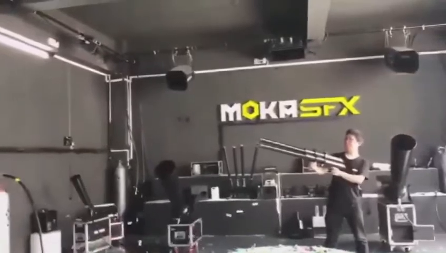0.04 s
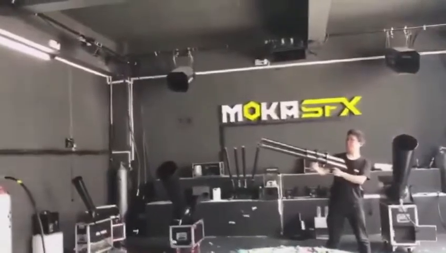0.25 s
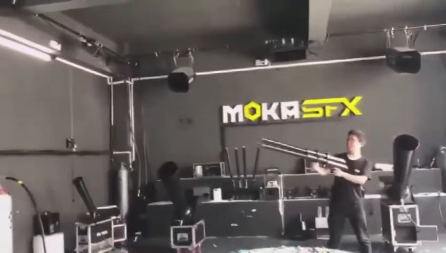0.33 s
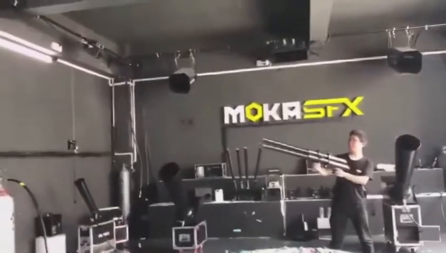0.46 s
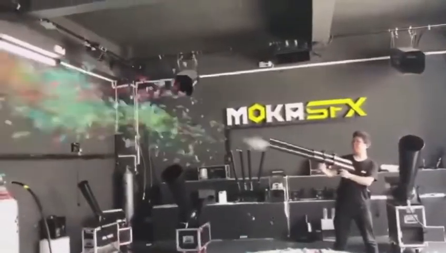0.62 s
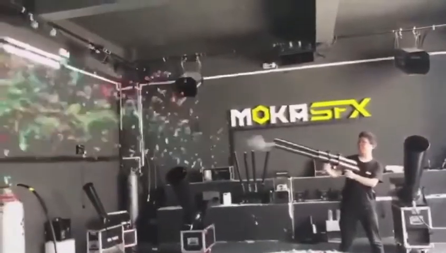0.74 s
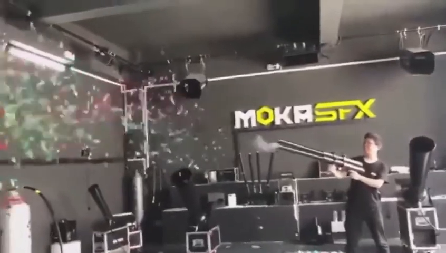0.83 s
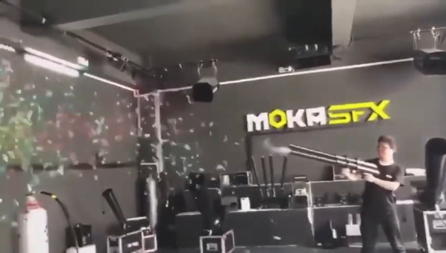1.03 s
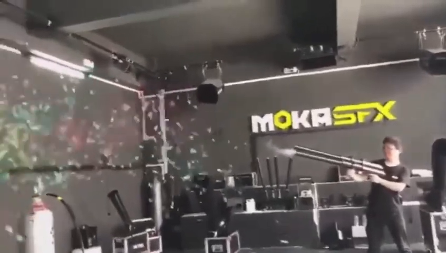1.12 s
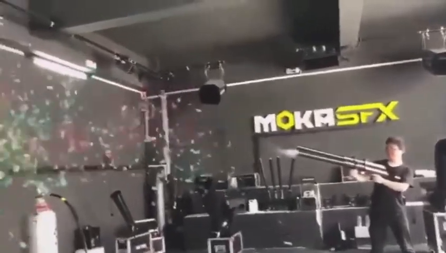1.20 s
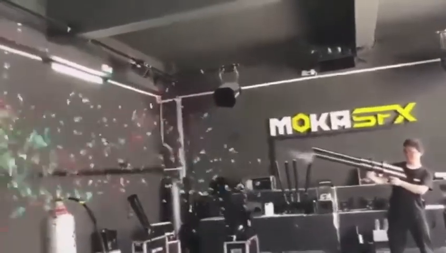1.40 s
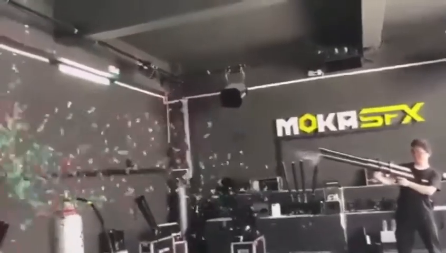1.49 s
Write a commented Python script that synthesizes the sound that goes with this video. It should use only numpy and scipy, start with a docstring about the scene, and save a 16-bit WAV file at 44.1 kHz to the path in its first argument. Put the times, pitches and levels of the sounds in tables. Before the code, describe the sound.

One sharp confetti cannon pop and a hissing rush of gas, ringing around a hard-walled room.

```python
"""A hard-walled workshop, where a compressed-gas confetti launcher fires once.
The valve hisses, gas rushes up the barrel and the charge pops out with a low puff of air.
The tank then empties in a fluttering, spitting jet that the room draws out into a long whoosh.
The bang overloads the recorder, which ducks its gain; one faint tick follows the shot."""
import sys
import numpy as np
from scipy import signal
from scipy.fft import rfft, irfft
from scipy.io import wavfile

SR = 44100
rng = np.random.default_rng(int(sys.argv[2]) if len(sys.argv) > 2 else 0)


def inscribe(sig):
    """Save sig as 16-bit PCM at rate SR to the path in sys.argv[1].

    A 1-D sig is mono; a 2-D sig holds one channel per row.
    Samples are clipped to [-1, 1] before scaling.
    """
    pcm = np.round(np.clip(np.atleast_2d(sig).T, -1, 1) * 32767)
    wavfile.write(sys.argv[1], SR, pcm.astype(np.int16))


N = 68355
TIME = np.arange(N) / SR
FREQS = np.maximum(np.fft.rfftfreq(N, 1 / SR), 1)

VALVE_S, RUSH_S, POP_S = 0.16, 0.2004, 0.2256   # cues: valve opens, gas rushes, charge leaves the muzzle
BANDWIDTH_HZ = 7660   # top of the recorder's input band

# Colour of the workshop's room tone: frequency_hz, relative_db
ROOM_TONE_COLOUR = [(25, -16), (75, 4), (130, -1.5), (300, -2.5), (700, -5.5), (1450, -7.5), (2000, -16.5),
                    (3200, -18.5), (5000, -24.5), (7500, -28.5)]
# Reverb time across the spectrum: frequency_hz, t60_s
REVERB_TIMES = [(60, 0.87), (200, 1.35), (600, 1.53), (2000, 1.69), (4000, 1.56), (7500, 1.03)]
# Clusters of room modes that ring on: centre_hz, width_hz, gain_db
MODE_CLUSTERS = [(448, 26.5, -1), (837, 50, -10), (1158, 59, -4.5), (1800, 70, -3.5), (2015, 50, -6.5)]
# Colour of the air pushed out ahead of the charge: frequency_hz, relative_db
PUFF_COLOUR = [(20, -18), (50, 1.5), (100, 2), (165, -4.5), (260, -21.5), (600, -44)]
# Hiss spat out by the jet: peak_s, half_length_s, level_db, centre_hz, width_hz
HISS_SPURTS = [(.26, 0.022, -18.5, 6700, 2600), (0.281, 0.019, -19, 5200, 2600),
               (0.315, 0.015, -26.5, 7000, 1200), (0.359, 0.02, -18.5, 6960, 2000),
               (.41, .017, -22.5, 6600, 800), (0.472, 0.017, -21.5, 5120, 890),
               (0.521, 0.017, -25, 5850, 600), (.567, .022, -29.5, 6930, 1500),
               (.64, 0.033, -30.5, 4200, 1500), (0.735, 0.015, -40, 6250, 1800)]
# Colour of the open jet: frequency_hz, relative_db
JET_COLOUR = [(30, -37), (70, -4), (130, -7), (200, -2.5), (320, -3), (600, -9.5), (1000, -4.5), (1450, -6),
              (2400, -4), (3400, -7.5), (5400, -16), (7500, -28.5)]
# Barrel and room resonances mixed into the jet: centre_hz, width_hz, gain_db
JET_RESONANCES = [(198.3, 24, -2), (438, 47, -3.5), (625, 63, 7.5), (1172, 110, -4), (1410, 33, -3.5),
                  (1755, 71, -12.5), (2070, 48, -6.5), (2566, 48, -6.5), (3430, 130, -17.5),
                  (4020, 82, -13.5)]
# Gas flow, easing after the shot and swelling before the tank runs out: time_s, gain_db
JET_ENVELOPE = [(.245, 3), (.285, -3), (.33, -0.5), (.38, 0), (.45, -1), (.495, 0), (.53, -6), (.6, -12.5),
                (.75, -28), (1.1, -82)]
# Colour of the gas rushing up the barrel: frequency_hz, relative_db
RUSH_COLOUR = [(30, -8.5), (100, -1.5), (250, -5.5), (450, -4), (850, -5.5), (1600, -10.5), (3100, -12.5),
               (4400, -19.5), (6600, -14), (7600, -27.5)]
# Colour of the gas tearing past the charge: frequency_hz, relative_db
CRACK_COLOUR = [(100, -27.5), (800, -0.5), (1700, -6), (3000, -1), (4400, -3), (6600, -7), (7500, -25)]
# Faint slow swells of the barrel after the pop, each scaled by a nominal pitch far below audible: pitch_hz,
# level_db, decay_s
BARREL_SWELL = [(50, -24, 0.033), (157, -21, .014), (410, -8, 0.013), (510, -17.5, .014), (710, -18, .015),
                (1830, -18, .016)]


def from_db(db):
    """Decibels to gain."""
    return 10 ** (np.asarray(db) / 20)


def rms_one(x):
    """Scale to unit rms."""
    return x / np.sqrt(np.mean(x ** 2) + 1e-20)


def at_hz(points, hz):
    """Read a table on a log-frequency axis."""
    frequencies, values = np.transpose(points)
    return np.interp(np.log(hz), np.log(frequencies), values)


def since(start_s):
    """Seconds after a cue, zero before it."""
    return np.maximum(TIME - start_s, 0)


def noise(colour):
    """Coloured noise within the input band, rms 1."""
    eq = from_db(at_hz(colour, FREQS)) * (FREQS < BANDWIDTH_HZ)
    return rms_one(irfft(rfft(rng.standard_normal(N)) * eq, N))


def flutter(corner_hz=25):
    """Slow random wavering, rms 1."""
    return rms_one(irfft(rfft(rng.standard_normal(N)) / (1 + (FREQS / corner_hz) ** 2), N))


def bands(x):
    """Split into third-octave bands, yielding centre_hz and signal."""
    centres, spectrum = np.geomspace(30, 7680, 25), rfft(x)
    for hz, share in zip(centres, np.eye(len(centres))):
        crossover = np.interp(np.log(FREQS), np.log(centres), share)
        yield hz, irfft(spectrum * crossover, N)


def resonate(x, hz, width_hz):
    """Two-pole resonance with unity gain at its peak."""
    radius = np.exp(-np.pi * width_hz / SR)
    feedback = [1, -2 * radius * np.cos(2 * np.pi * hz / SR), radius ** 2]
    return signal.lfilter(np.array([1, 0, -1]) * (1 - radius ** 2) / 2, feedback, x)


def low_pass(x, hz):
    """Brick-wall high cut."""
    return signal.fftconvolve(x, signal.firwin(601, hz, fs=SR, window=("kaiser", 9)), "same")


def smooth(x, time_s):
    """One-pole lag."""
    keep = np.exp(-1 / (time_s * SR))
    return signal.lfilter([1 - keep], [1, -keep], x)


def room_tone():
    """The workshop's steady, low bed of noise."""
    return from_db(-39) * noise(ROOM_TONE_COLOUR)


def workshop_reverb(x, build_s=0.014, mode_t60_s=2.16):
    """Hard walls give a diffuse tail that blooms fast and dies sooner up top; room modes ring on."""
    wash = sum(band * from_db(-60 * TIME / at_hz(REVERB_TIMES, hz))
               for hz, band in bands(rng.standard_normal(N)))
    modes = sum(from_db(db) * resonate(rng.standard_normal(N), hz, width)
                for hz, width, db in MODE_CLUSTERS)
    tail = wash + modes * from_db(-60 * TIME / mode_t60_s)
    tail *= 1 - np.exp(-TIME / build_s)
    return signal.fftconvolve(x, tail / np.sqrt(np.sum(tail ** 2)))[:N]


def treble_flicker(x, corner_hz=4000):
    """The treble flickers, partly in step and partly band by band."""
    together, out = flutter(), 0
    for hz, band in bands(x):
        depth_db = 3 * hz ** 2 / (hz ** 2 + corner_hz ** 2)
        out += band * from_db(depth_db * (0.5 * together + flutter()))
    return out


def tick(at_s=0.3004):
    """One faint, very bright tick."""
    return from_db(-21) * (np.arange(N) == round(at_s * SR))


def valve():
    """A thin hiss fades in as the valve opens and cuts off at the pop."""
    opening = np.clip((TIME - VALVE_S) / (RUSH_S - VALVE_S), 0, 1) * (TIME < POP_S)
    hiss = rms_one(resonate(rng.standard_normal(N), hz=5450, width_hz=1700))
    return from_db(-39) * opening * hiss


def puff(start_s=0.22, attack_s=0.0099, decay_s=0.028):
    """Air pushed out ahead of the charge gives the shot its low end."""
    age = since(start_s)
    envelope = (1 - np.exp(-age / attack_s)) * np.exp(-age / decay_s)
    return from_db(-16.5) * noise(PUFF_COLOUR) * envelope


def spurts():
    """The jet spits short surges of hiss, each centred on its own pitch."""
    out = 0
    for peak_s, half_length_s, db, hz, width in HISS_SPURTS:
        hiss = rms_one(resonate(resonate(rng.standard_normal(N), hz, width), hz, width))
        swell = np.exp(-2 * ((TIME - peak_s) / half_length_s) ** 2)
        out += from_db(db) * hiss * swell
    return out


def jet(turbulence_db=3, dulling_db_per_s=38.5):
    """The tank empties through the barrel: hiss fills out into a fluttering roar, dulls and runs out."""
    age, roar = since(POP_S), noise(JET_COLOUR)
    ringing = sum(from_db(db) * resonate(roar, hz, width) for hz, width, db in JET_RESONANCES)
    out = 0
    for hz, band in bands(rms_one(roar + ringing)):
        attack_s = 0.073 / (1 + hz / 2000)   # highs open first, so the hiss leads the roar
        opening = 1 - np.exp(-age / attack_s)
        dulling_db = dulling_db_per_s * age * hz / 7000   # the top fades as tank pressure drops
        out += band * opening * from_db(turbulence_db * flutter() - dulling_db)
    flow_db = np.interp(TIME, *np.transpose(JET_ENVELOPE))
    return from_db(flow_db - 13) * out


def barrel_rush(rise_db=23, decay_s=0.006):
    """Gas swells behind the charge: a short riser into the pop."""
    to_go = np.clip((POP_S - TIME) / (POP_S - RUSH_S), 0, 1)
    envelope = (TIME > RUSH_S) * from_db(-6 - rise_db * to_go) * np.exp(-since(POP_S) / decay_s)
    return noise(RUSH_COLOUR) * envelope


def crack(lead_s=0.0035, decay_s=0.0017):
    """Gas tears past the charge just before the pop, putting a bright edge on it."""
    envelope = (TIME > POP_S - lead_s) * np.exp(-since(POP_S) / decay_s)
    return from_db(-8) * noise(CRACK_COLOUR) * envelope


def muzzle_pop(start_hz=1250, end_hz=377, glide_s=0.001, decay_s=0.002):
    """The muzzle uncorks with a fast pitch drop; the barrel adds only a faint, slow swell."""
    age = since(POP_S)
    pitch_hz = end_hz + (start_hz - end_hz) * np.exp(-age / glide_s)
    phase = 2 * np.pi * np.cumsum(pitch_hz * (age > 0)) / SR
    pop = from_db(10.5) * np.sin(phase) * np.exp(-age / decay_s)
    ring = sum(from_db(db) * np.sin(2 * np.pi * hz * age / SR) * np.exp(-age / ring_s)
               for hz, db, ring_s in BARREL_SWELL)
    return pop + ring


def first_reflection(x, delay_s=0.013):
    """The room slaps the shot back with a midrange ring."""
    delayed = np.interp(TIME - delay_s, TIME, x, left=0)
    return from_db(8) * resonate(delayed, hz=1900, width_hz=285)


def scene():
    """Mono mix: the shot and its slapback up front, over the jet, the reverb and the room tone."""
    bang = valve() + barrel_rush() + crack() + muzzle_pop()
    gas, hiss = jet(), spurts()
    reverb = workshop_reverb(from_db(-1.5) * bang + gas + from_db(-3.5) * hiss)
    front = bang + puff() + hiss + first_reflection(bang)
    wash = from_db(4.5) * gas + reverb + room_tone()
    return (front + treble_flicker(wash))[None]


def gain_control(x, threshold_db=-14, slope=0.7, sense_s=0.011, attack_s=0.0047, release_db_per_s=0.5):
    """The gain ducks just too late for the bang and creeps back up."""
    level_db = 10 * np.log10(smooth(x ** 2, sense_s) + 1e-12)
    cut_db = slope * np.maximum(level_db - threshold_db, 0)
    release_db = release_db_per_s * TIME
    held_cut_db = np.maximum.accumulate(cut_db + release_db) - release_db
    return x * from_db(-smooth(held_cut_db, attack_s))


def record(dry):
    """Recorder chain: gain control, soft saturation, high cut, a stray tick and a full-scale clip."""
    ceiling = 1.47
    saturated = ceiling * np.tanh(gain_control(dry[0]) / ceiling)
    clipped = np.clip(low_pass(saturated, BANDWIDTH_HZ) + tick(), -1, 1)
    return low_pass(clipped, hz=16000)[None]


dry = scene()
out = record(dry)
inscribe(out)
```